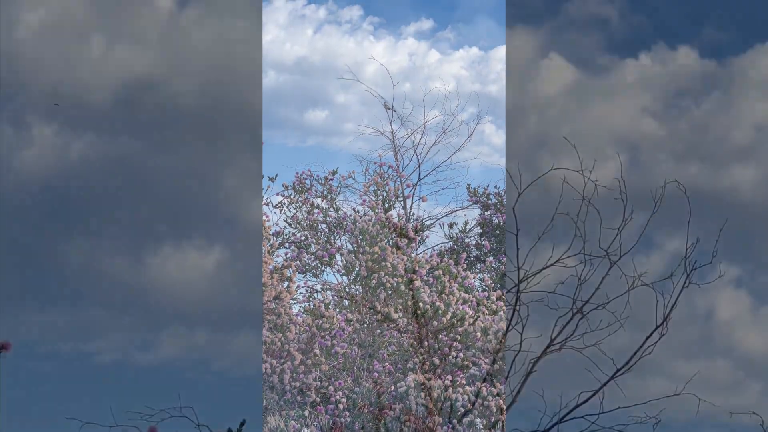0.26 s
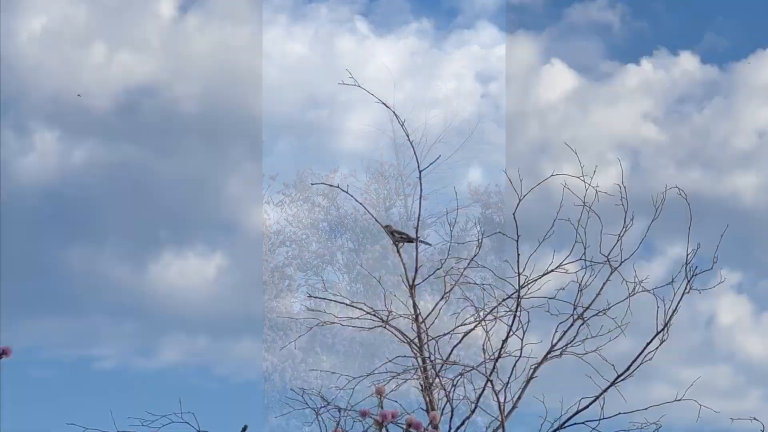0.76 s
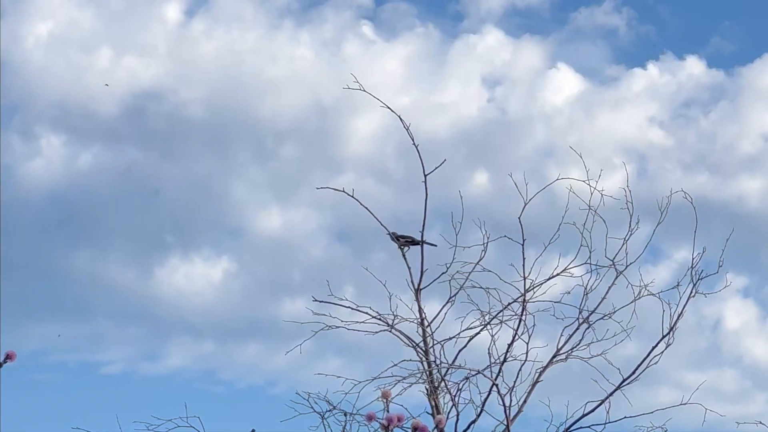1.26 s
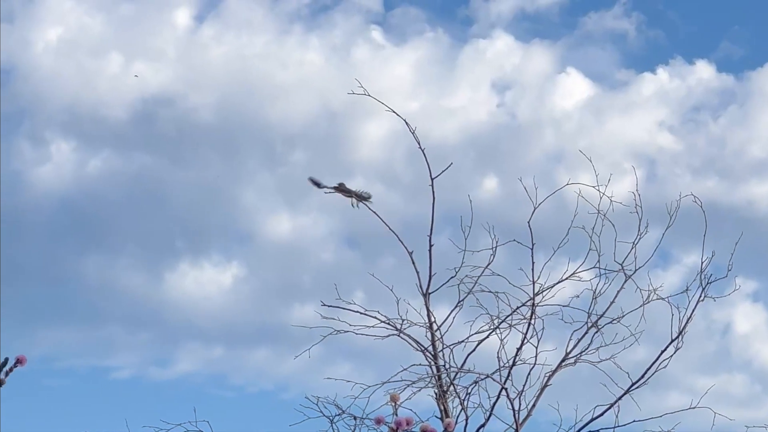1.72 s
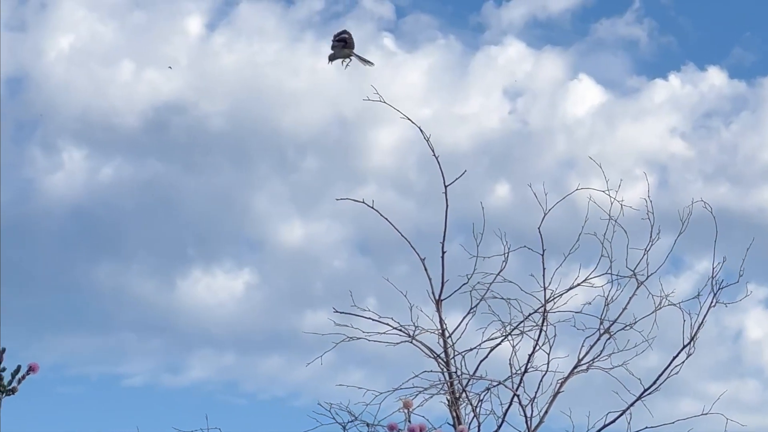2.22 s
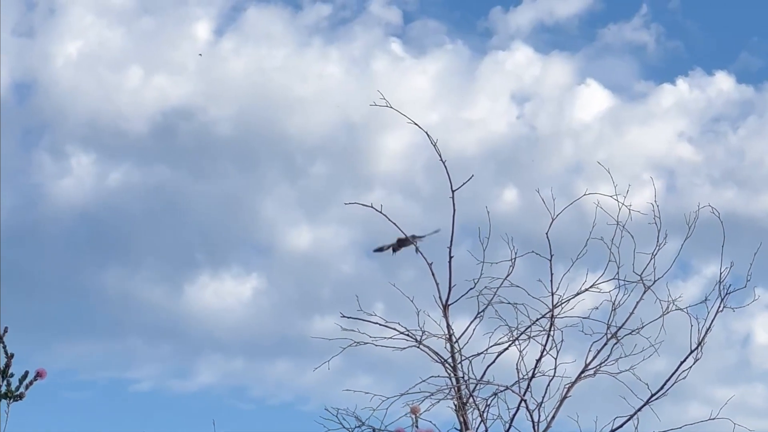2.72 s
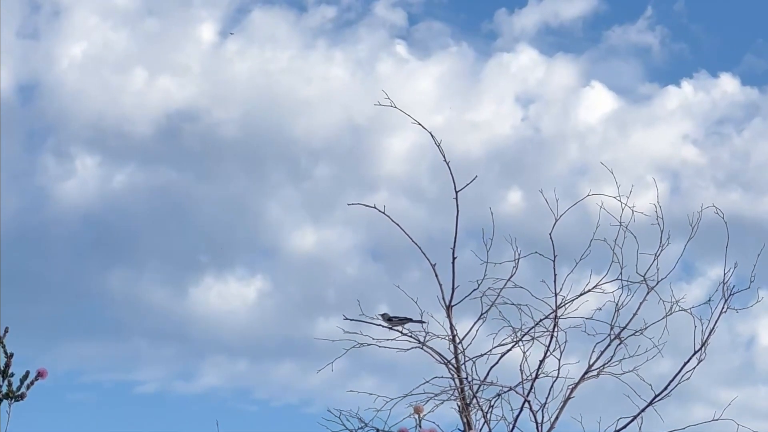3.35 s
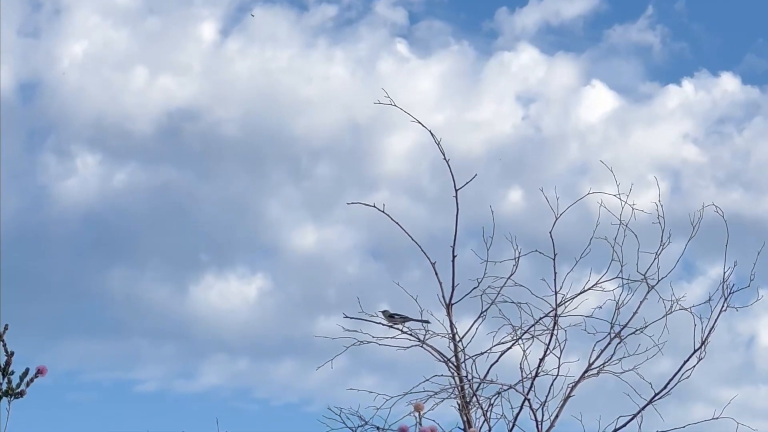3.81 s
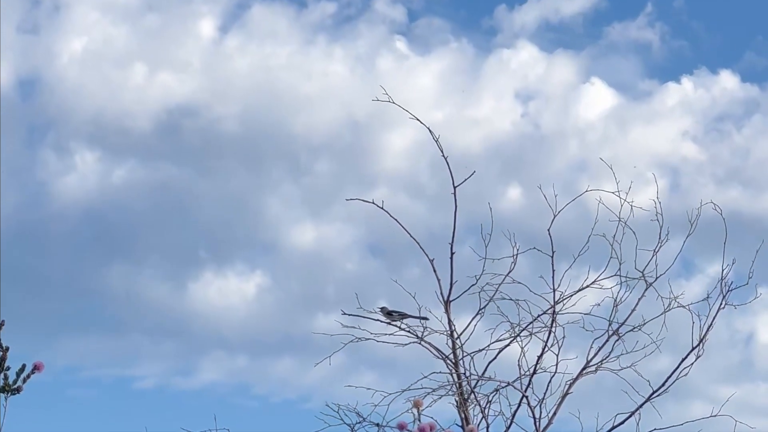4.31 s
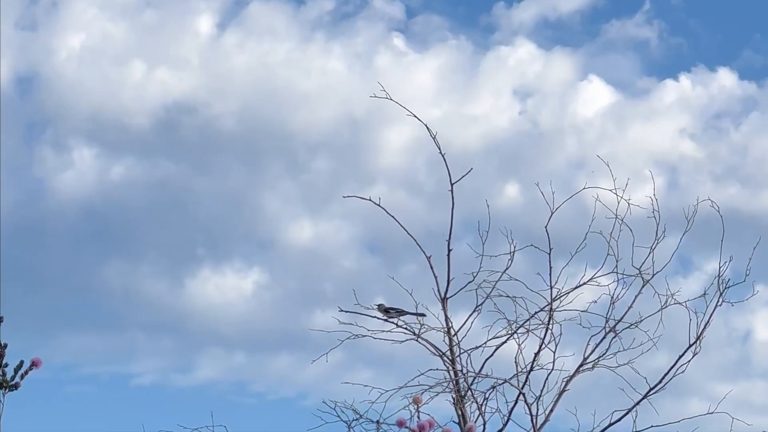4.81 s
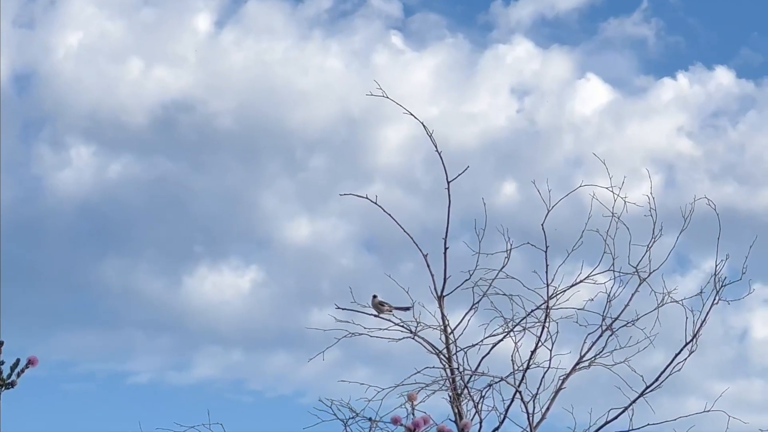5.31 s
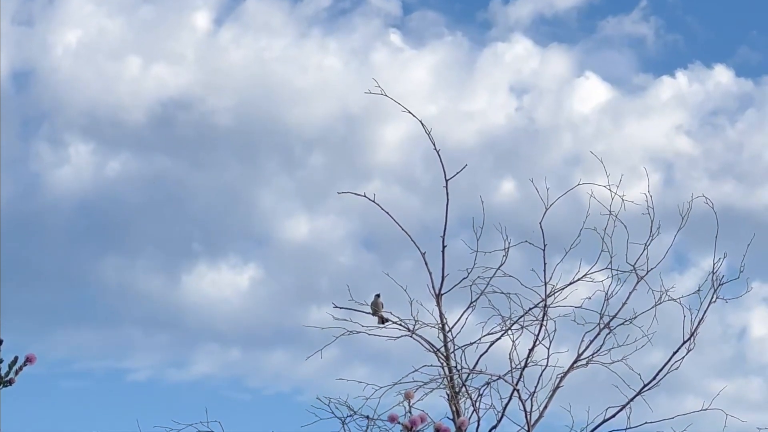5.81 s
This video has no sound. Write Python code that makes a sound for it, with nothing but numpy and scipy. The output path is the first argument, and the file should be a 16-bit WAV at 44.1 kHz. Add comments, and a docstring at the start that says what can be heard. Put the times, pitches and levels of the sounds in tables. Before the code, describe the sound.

Outdoors among trees, a songbird gives a few short two-toned notes, then a quick run of falling trills, during which its wings rustle very faintly with a few dry ticks. It switches to six phrases, each a thin high whistle and two buzzes. A distant town rumbles underneath and far birds chirp faintly. The song is clear, with a slight echo, in narrow stereo.

```python
"""Over the rumble of a distant town another bird ends a whistle, while a neighbour rasps, something hums
briefly and far birds call; ground and trees return short echoes. Both sides of a songbird's voice box then
sound together in three two-voiced notes. Frequency modulation makes a run of falling trills, during which
feathers rustle in a short flight and faint ticks sound. Last come six phrases of one high whistle and two
buzzes. Throughout, two close microphone ports shift the phase of the treble between the sides."""
import sys
import numpy as np
from scipy import signal
from scipy.fft import rfft, irfft, next_fast_len
from scipy.io import wavfile
from scipy.ndimage import uniform_filter1d

SR = 44100
rng = np.random.default_rng(int(sys.argv[2]) if len(sys.argv) > 2 else 0)


def master_out(mix):
    """Clip the mix to full scale and print it as 16-bit PCM to the path in sys.argv[1]."""
    frames = np.transpose(np.atleast_2d(mix))
    ceiling = np.clip(frames, -1, 1)
    pcm = np.round(ceiling * 32767).astype(np.int16)
    wavfile.write(sys.argv[1], SR, pcm)


N = 267228


def amp(db):
    """Amplitude ratio of a level in decibels."""
    return 10 ** (np.asarray(db) / 20)


def read(points, hz):
    """Interpolation on a logarithmic frequency axis."""
    f, value = np.transpose(points)
    return np.interp(np.log(hz + 1), np.log(f + 1), value)


def add(mix, s, sound):
    """Superposition: a sound joins the mix at s seconds."""
    part = mix[round(s * SR):][:len(sound)]
    part += sound[:len(part)]


def wander(n, span):
    """Low-pass noise of unit deviation, correlated over about span samples."""
    x = uniform_filter1d(uniform_filter1d(rng.standard_normal(n), span), span)
    return x / np.std(x)


def spread(shape, length):
    """Time scaling: a note's contours stretched over length seconds, u running from 0 to 1."""
    share, *columns = np.transpose(shape)
    u = np.linspace(0, 1, round(length * SR))
    return u, [uniform_filter1d(np.interp(u, share / share[-1], c), 60) for c in columns]


def voice(hz, tones, rough, breath_db, bright_db=0):
    """Source and filter: harmonics of an unsteady pitch and pulsed breath, coloured by the beak."""
    # response of the open beak to overtones and breath: (f/Hz, gain/dB)
    beak = [(3000, 2.5), (4500, 1), (6000, -5.5), (7500, 5), (9500, -6), (12500, 4), (15000, 0.5)]
    phase = 2 * np.pi * np.cumsum(hz * (1 + rough * wander(len(hz), 33))) / SR
    out = np.zeros(len(hz))
    for k, db in tones:
        pitch = k * hz
        colour_db = (pitch > 4600) * bright_db + (k > 1) * read(beak, pitch)
        out += np.sqrt(2) * amp(db + colour_db) * (pitch < 17000) * np.sin(k * phase)
    air = rng.standard_normal(len(hz)) * (1 + np.sin(phase))
    f = np.fft.rfftfreq(len(hz), 1 / SR)
    breath = irfft(rfft(air) * amp(read(beak, f)) * (f > 1800), len(hz))
    return out + amp(breath_db + bright_db) * breath


def glide(rows, tones, rough, flutter_db, breath_db):
    """Slow modulation: a voice follows rows of (t/s, f/Hz, level/dB). Returns start and sound."""
    s, hz, db = np.transpose(rows)
    t = np.arange(s[0], s[-1], 1 / SR)
    hz, db = (uniform_filter1d(np.interp(t, s, c), 120) for c in (hz, db))
    fade_in = np.minimum((t + (s[0] <= 0) - s[0]) / .00062, 1)  # none if already sounding at t = 0
    fade_out = np.minimum((s[-1] - t) / .0038, 1)
    gain = fade_in * fade_out * amp(db + flutter_db * wander(len(t), 300))
    return s[0], gain * voice(hz, tones, rough, breath_db)


def opening_whistle():
    """Nearly sinusoidal oscillation: the wavering end of a whistle near 3 kHz."""
    # whistle contour: (t/s, f/Hz, level/dB)
    contour = [(0, 2740, -50), (.005, 3245, -32), (.012, 3290, -29.5), (.016, 2670, -52), (.022, 3040, -26),
               (.029, 3214, -33), (.036, 2916, -32.5), (.05, 3043, -30.5), (.079, 2934, -42.5)]
    out = np.zeros(N)
    add(out, *glide(contour, [(1, -2), (2, -31.5), (3, -29)], rough=.004, flutter_db=1, breath_db=-35))
    return out


def town():
    """Partly coherent noise with drifting spectral patches: rumble, wash and a thin hiss."""
    # noise spectrum: (f/Hz, relative density/dB)
    spectrum = [(13, -38), (22, -30), (40, -5.5), (71, 2.5), (130, -10.5), (190, -19), (230, -21.5),
                (468, -28), (522, -30.5), (615, -27), (1690, -44), (4640, -67.5), (5320, -65), (6260, -67),
                (15000, -70)]
    # swells of the rumble: (t/s, level/dB)
    swells = [(0, -42), (.56, -49), (1.16, -41), (4.37, -45), (4.57, -34), (4.9, -43.5), (6.06, -44)]
    # likeness of left and right: (f/Hz, coherence)
    coherence = [(100, .99999), (150, .999), (300, .93), (500, .76), (800, .66), (1200, .68), (2000, .97),
                 (4000, .97), (6000, .7), (15000, .7)]
    frames, hz = N // 512 + 5, np.fft.rfftfreq(2048, 1 / SR)
    a, b, c, d, patches = rng.standard_normal((frames, 1025, 5)).T
    patches = uniform_filter1d(uniform_filter1d(patches, 14, 0), 8, 1)
    same, left = read(coherence, hz)[:, None], a + 1j * b
    spectra = np.array([left, same * left + np.sqrt(1 - same ** 2) * (c + 1j * d)])
    s, level_db = np.transpose(swells)
    low = 1 / (1 + (hz / 150) ** 2)  # only the rumble follows the swells
    swell_db = np.interp(np.arange(frames) * 512 / SR, s, level_db - level_db.mean())
    spectra *= amp(read(spectrum, hz)[:, None] + 1.1 * patches / patches.std() + low[:, None] * swell_db)
    out = signal.istft(spectra, nperseg=2048, noverlap=1536)[1][:, :N]
    return amp(level_db.mean() + 1.26) * out / out.std()


def rasp_and_hum():
    """Harmonic content sets timbre: a neighbour's overtone-rich rasp and a low hum of one partial."""
    # contours of the two sounds: (t/s, f/Hz, level/dB)
    rasp = [(0, 2180, -50.5), (.004, 2760, -51), (.009, 2990, -40.5), (.013, 2440, -46.5),
            (.024, 2240, -71.5)]
    hum = [(0, 365, -67), (.2, 360, -67), (.36, 360, -75)]
    out = np.zeros(N)
    tones = [(1, 3), (2, 0), (3, -13.5), (4, -1.5)]
    add(out, *glide(rasp, tones, rough=.0082, flutter_db=1.5, breath_db=-15.5))
    add(out, *glide(hum, [(1, 0)], rough=.04, flutter_db=5, breath_db=-53))
    return out


def far_birds():
    """Thin calls with random frequency modulation; pitch and level follow parabolic arcs."""
    # calls: (start t/s, length/s, first f/Hz, middle f/Hz, last f/Hz, level/dB, jitter/Hz)
    calls = [(0, 0.091, 1020, 995, 990, -59.5, 30), (0.233, 0.084, 1100, 1278, 1160, -60.5, 69),
             (.24, 0.16, 7580, 8070, 8130, -81, 60), (.26, 0.097, 2513, 3200, 2140, -76.5, 110),
             (0.436, .09, 2588, 3156, 2272, -84, 110), (0.78, 0.16, 3550, 2770, 2470, -77, 111),
             (0.879, 0.13, 4300, 3720, 3430, -72.5, 110), (0.959, 0.081, 1084, 1038, 940, -61.5, 30),
             (1.173, .14, 2700, 2380, 2250, -82.5, 90), (2.621, 0.18, 900, 1038, 1120, -60.5, 30),
             (3.001, 0.081, 2860, 2795, 2700, -62, 110), (3.03, .08, 5470, 5250, 5300, -71, 262),
             (3.706, 0.087, 1798, 1670, 1567, -67.5, 40), (3.717, 0.11, 3450, 3200, 3110, -80.5, 80),
             (3.772, 0.088, 5600, 5270, 5270, -73.5, 330), (4.955, 0.11, 2400, 2280, 2170, -69, 110),
             (5.32, 0.11, 2700, 2440, 2330, -64.5, 120)]
    out = np.zeros(N)
    u = np.linspace(0, 1, 12)
    ends = (2 * u - 1) ** 2
    for s, length, first, middle, last, db, jitter in calls:
        hz = first + (last - first) * u + (middle - (first + last) / 2) * (1 - ends)
        rows = np.transpose([s + length * u, hz, db - 6 * ends])
        add(out, *glide(rows, [(1, 0)], rough=jitter / middle, flutter_db=3.5, breath_db=-46))
    return out


def coupled_voices(length, db, factor):
    """Nonlinear coupling of two voices breeds sum tones; once it ends, the upper voice shakes."""
    # note contour: (share of length, upper f/Hz, upper level/dB, lower f/Hz, lower level/dB)
    contour = [(0, 2530, -37, 2350, -48), (.07, 2880, -4.5, 2360, -22), (.19, 3554, -4.5, 2636, -21),
               (.3, 3760, -2, 2716, -12), (.52, 3759, -5.5, 2615, -6), (.66, 3560, -8.5, 2610, -8.5),
               (.72, 2633, 3, 2560, -31), (.85, 2610, -10.5, 2660, -36), (1, 2320, -30, 2600, -30)]
    # combination tones: (multiple of upper, multiple of lower, level/dB)
    sum_tones = [(1, 1, -14), (2, 0, -28), (1, 2, -30), (2, 1, -22.5), (2, 2, -17.5)]
    coupled_share, shake_hz, shakes_per_s = .68, 396, 100
    u, (high_hz, high_db, low_hz, low_db) = spread(contour, length)
    shake = (u > coupled_share) * np.sin(2 * np.pi * shakes_per_s * length * (u - coupled_share))
    high, low = (2 * np.pi * np.cumsum(factor * f * (1 + .011 * wander(len(u), 40))) / SR
                 for f in (high_hz - shake_hz * shake, low_hz))
    out = amp(high_db) * np.sin(high) + amp(low_db) * np.sin(low)
    coupling = np.clip(u / .11, 0, 1) * np.clip((coupled_share - u) / .0083, 0, 1)
    for m, n, sum_db in sum_tones:
        out += coupling * amp(sum_db + 1.1 * wander(len(u), 200)) * np.sin(m * high + n * low)
    out += amp(high_db - 23) * np.diff(rng.standard_normal(len(u) + 1))  # breath
    return amp(db) * np.sqrt(2) * out * signal.windows.tukey(len(u), .06)


def two_voiced_notes():
    """Biphonation: three notes of two pitches at once, each opened by an upward flick."""
    # notes: (start t/s, length/s, level/dB, pitch factor)
    notes = [(0.124, 0.071, -61.5, 1.001), (0.557, 0.077, -40.5, 1.01), (0.974, 0.077, -36.5, 1.001)]
    # opening flick: (t/s from the note's start, f/Hz, level/dB relative to the note)
    flick = [(-.006, 2900, -20), (-.001, 3700, -26), (.003, 4220, -11.5), (.006, 4400, -18)]
    out = np.zeros(N)
    for s, length, db, factor in notes:
        add(out, s, coupled_voices(length, db, factor))
        rows = np.array(flick) + (s, 0, db)
        add(out, *glide(rows, [(1, 7.5), (2, -12)], rough=.068, flutter_db=-.5, breath_db=-5))
    return out


def warbled(shape, tones, note, bright_db, rough, breath_db, second_db,
            warble_per_s=0, cusp=0, skew=0, crest_db=0, lag_s=.004):
    """Frequency modulation about a contour; the other side of the voice box follows lag_s later."""
    s, length, db, factor, swell_db = note
    u, (hz, level_db, depth) = spread(shape, length)
    cycles = warble_per_s * length * (1 + .101 * rng.uniform(-.964, 1))  # each note has its own speed
    phase = 2 * np.pi * (cycles * u + .0078 * wander(len(u), 450))
    # cusp sharpens the crests; skew makes rise and fall unequal
    swing = np.cos(phase) + cusp * np.cos(2 * phase) + skew * np.sin(2 * phase)
    hz = factor * hz * (1 + depth * swing + .003 * wander(len(u), 1500))
    gain = amp(db + level_db + swell_db * (u - .5) + crest_db * swing + 1.75 * wander(len(u), 150))
    gain *= signal.windows.tukey(len(u), .05)
    lag = round(lag_s * SR)
    first = np.pad(gain * voice(hz, tones, rough, breath_db, bright_db), (0, lag))
    second = np.pad(gain * voice(hz, tones, rough, breath_db, bright_db), (lag, 0))
    return s, first + amp(second_db) * second


def trills():
    """Fast frequency modulation spreads sidebands around a falling tone."""
    # note contour: (share of length, f/Hz, level/dB, warble depth as a share of pitch)
    contour = [(0, 2676, -9, 0.00087), (.04, 4193, -38.5, .023), (.075, 3660, -9, 0.087),
               (.22, 3220, -4.5, 0.11), (.45, 2765, -7, .125), (.65, 2335, -5, 0.12), (.85, 2275, -3, .095),
               (.92, 1955, -4.5, 0.02), (1, 1540, -12.5, 0.034)]
    # partials: (harmonic number, level/dB)
    tones = [(1, 0), (2, -31.5), (3, -33), (4, -40), (5, -57), (6, -49)]
    # notes: (start t/s, length/s, level/dB, pitch factor, swell/dB, brightness/dB)
    notes = [(1.399, .1165, -41.5, 0.98, 12.5, 3.5), (1.55, .12, -37, 0.97, 2.5, -0.5),
             (1.705, 0.12, -36.5, .97, 1, -2), (1.868, .12, -35, .97, -1, 3),
             (2.032, .12, -34.5, 0.9855, -5.5, 6), (2.196, 0.13, -32.5, .99, -6, 6),
             (2.365, .13, -34, 0.99, -7.5, 7.5), (2.535, .13, -34, 0.99, -3.5, 5.5),
             (2.71, .132, -34.5, 1.01, -5.5, 6), (2.884, .13, -33, 1.002, -8, 2),
             (3.062, .13, -34, 1, -4.5, 3.5), (3.244, 0.1314, -33, 1.006, -4, 3),
             (3.431, .13, -33.5, 1.02, -1.5, 4.5)]
    out = np.zeros(N)
    for *note, bright_db in notes:
        add(out, *warbled(contour, tones, note, bright_db, rough=.009, breath_db=-34, second_db=-12,
                          warble_per_s=106, cusp=.2, skew=.2, crest_db=-.5))
    return out


def wings():
    """Amplitude-modulated noise: feathers rustle with each flap as the bird flutters up and lands."""
    peak_s, rise_s, fall_s, flaps_per_s = 2.5, .77, .65, 5.9
    t = np.arange(N) / SR
    flight_db = -75 - 10 * ((t - peak_s) / np.where(t < peak_s, rise_s, fall_s)) ** 2
    flap_db = 4 * np.cos(2 * np.pi * (flaps_per_s * t + .33 * wander(N, 6000)))
    flicker_db = 3 * wander(N, 300)
    rustle = signal.sosfilt(signal.butter(2, 4200, "high", fs=SR, output="sos"),
                            rng.standard_normal((2, N)))
    rustle[1] = 1.3 * rustle[0] + .5 * rustle[1]  # louder on the right
    return amp(flight_db + flap_db + flicker_db) * rustle


def ticks():
    """Exponentially damped bursts of bright noise: dry ticks, as of wing on twig."""
    # ticks: (t/s, level/dB)
    bursts = [(2.346, -73.5), (2.5094, -55), (2.7891, -62)]
    t60 = .018
    out = np.zeros(N)
    for s, db in bursts:
        add(out, s, amp(db - 60 * np.arange(600) / SR / t60) * np.diff(rng.standard_normal(602), 2))
    return out


def high_whistles():
    """A fundamental and its octave swell near 7 kHz, then sweep steeply down."""
    # note contour: (share of length, f/Hz, level/dB, offset as a share of pitch)
    contour = [(0, 7230, -30, .001), (.1, 7110, -10, .001), (.35, 7380, -4, .001), (.6, 7286, -2, 0.0011),
               (.71, 6940, -10, .001), (.8, 5130, -10, .001), (.89, 3290, -17, .001), (1, 2500, -40, .001)]
    # notes: (start t/s, length/s, level/dB, pitch factor, octave level/dB)
    notes = [(3.942, 0.06, -36, 1.01, -13), (4.282, 0.063, -36.5, 1.003, -19), (4.64, 0.063, -36.5, 1, -15),
             (5.003, 0.069, -36, 1, -15), (5.373, .067, -34.5, .995, -10.5), (5.75, 0.072, -35, 1.024, -15)]
    swell_db = 17
    out = np.zeros(N)
    for *note, octave_db in notes:
        add(out, *warbled(contour, [(1, 0), (2, octave_db)], (*note, swell_db),
                          bright_db=4, rough=.0025, breath_db=-28, second_db=-26))
    return out


def buzzes():
    """A harmonic series on a missing fundamental near 1 kHz, roughened by frequency modulation."""
    # note contour: (share of length, f/Hz, level/dB, warble depth as a share of pitch)
    contour = [(0, 922, -22, 0.057), (.06, 978, -11.5, 0.0835), (.14, 1037, -3.5, 0.078),
               (.3, 1032, -3, 0.08), (.6, 1024, -4, .065), (.84, 1022, -4, 0.073), (.9, 969, -5.5, 0.03),
               (1, 987, -16, 0.0078)]
    # partials: (harmonic number, level/dB)
    tones = [(2, -23.5), (3, -4), (4, -6.5), (5, -11.5), (6, -21.5), (7, -26.5), (8, -26.5), (9, -17.5),
             (10, -54.5), (11, -27), (12, -47), (13, -66), (14, -48), (15, -30)]
    # notes: (start t/s, length/s, level/dB)
    notes = [(4.031, 0.087, -36.5), (4.148, 0.088, -37), (4.378, 0.091, -36), (4.502, 0.092, -37),
             (4.737, 0.092, -37), (4.859, 0.1, -38), (5.104, 0.092, -35.5), (5.231, 0.09, -35.5),
             (5.476, 0.092, -34.5), (5.605, 0.091, -36), (5.856, .1, -35.5), (5.993, 0.09, -36.5)]
    factor, swell_db = 1, 4
    out = np.zeros(N)
    for note in notes:
        add(out, *warbled(contour, tones, (*note, factor, swell_db),
                          bright_db=3.45, rough=.014, breath_db=-22, second_db=-14,
                          warble_per_s=98, cusp=.2, skew=-.05, crest_db=-.05, lag_s=.0045))
    return out


def trees(x):
    """Reflection and scattering: two ground echoes and sparse dying taps from branches."""
    # reverberation of near branches, then far trees: (t60/s, level/dB)
    tails = [(0.069, -11.5), (.45, -20)]
    # ground reflections: (delay t/s, level/dB)
    echoes = [(.0043, -20), (.0075, -17.5)]
    n, leaf_hz = SR // 2, 6000  # leaves absorb the tail above leaf_hz
    taps = np.zeros((2, n))
    at = np.arange(100, n - 20, 20) + rng.integers(0, 20, (2, (n - 101) // 20))
    np.put_along_axis(taps, at, rng.choice([-1., 1.], at.shape), 1)
    taps[1] = 1.05 * taps[0] + .15 * taps[1]  # the sides are nearly alike
    decays = [amp(-60 * np.arange(n) / SR / t60) for t60, db in tails]
    taps *= sum(amp(db) * d / np.linalg.norm(d * taps[0]) for d, (t60, db) in zip(decays, tails))
    taps = signal.sosfilt(signal.butter(1, leaf_hz, fs=SR, output="sos"), taps)
    for s, db in echoes:
        taps[:, round(s * SR)] += amp(db)
    return signal.fftconvolve(x[None], taps, axes=1)[:, :N]


def scene():
    """Direct and reflected sound add: far calls carry the most echo, the opening whistle the least."""
    near = two_voiced_notes() + trills() + buzzes() + high_whistles() + ticks()
    opening = opening_whistle()
    far = rasp_and_hum() + far_birds()
    echo = trees(near + amp(-3.5) * opening + amp(2.5) * far)
    return near + opening + amp(-2) * far + echo + wings() + town()


def record(dry):
    """Two close ports receive each frequency at their own phase and strength; a band limit follows."""
    # balance of the ports: (f/Hz, left minus right level/dB)
    balance = [(200, 0), (380, 1), (700, 2.8), (1290, 1.3), (1750, .9), (2300, 0)]
    # lead of the left port: (f/Hz, phase/rad)
    lead = [(0, 0), (130, 0), (600, .25), (1100, 0), (3700, -.05), (4480, -.6), (4910, -1.8), (5250, -5),
            (5770, -6.3), (6720, -6.5), (7300, -6.8), (10000, -7.8), (11500, -8.6), (12000, -9.2),
            (15200, -9.27)]
    low_edge_hz, high_edge_hz = 44, 15720
    n = next_fast_len(N + 4096)
    hz = np.fft.rfftfreq(n, 1 / SR)
    side = np.array([[.5], [-.5]])
    lean = amp(side * read(balance, hz))
    turn = np.exp(1j * side * np.interp(hz, *np.transpose(lead)))
    bass = 1 / np.sqrt(1 + (low_edge_hz / (hz + 1)) ** 8)  # the deepest rumble rolls off
    ported = irfft(rfft(dry, n) * lean * turn * bass, n)[:, :N]
    lowpass = signal.firwin(511, high_edge_hz, window=("kaiser", 9), fs=SR)
    return signal.oaconvolve(ported, lowpass[None], "same")


dry = scene()
out = record(dry)
master_out(out)
```